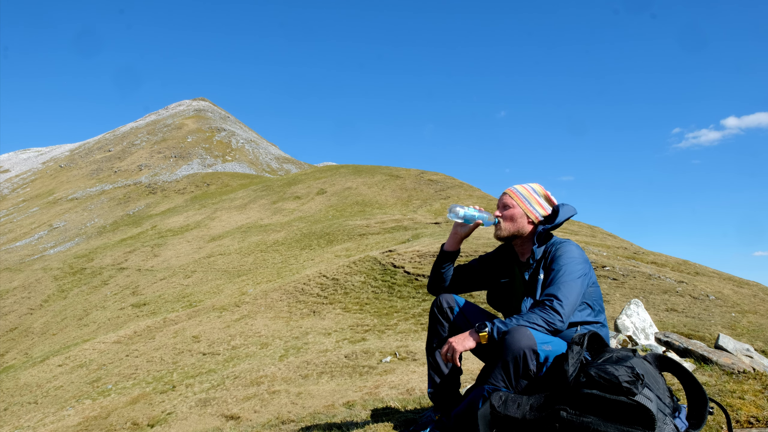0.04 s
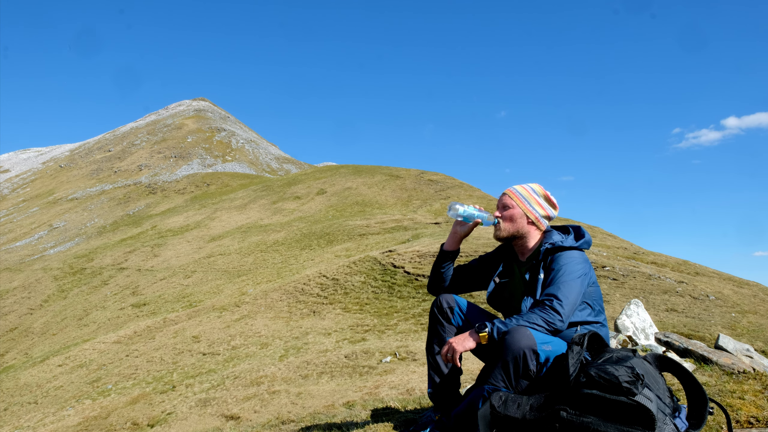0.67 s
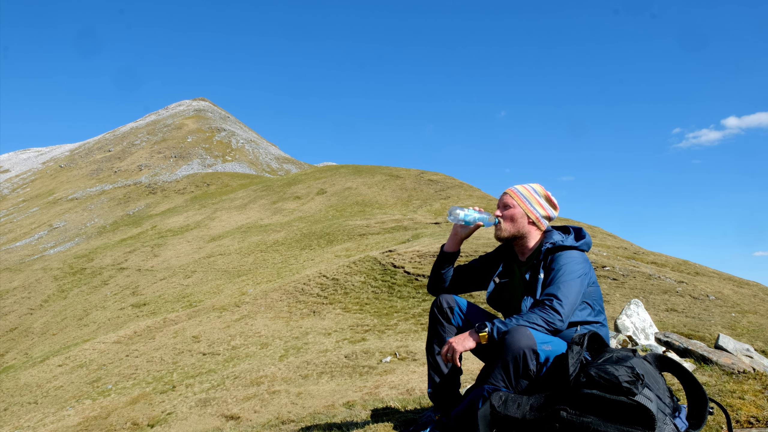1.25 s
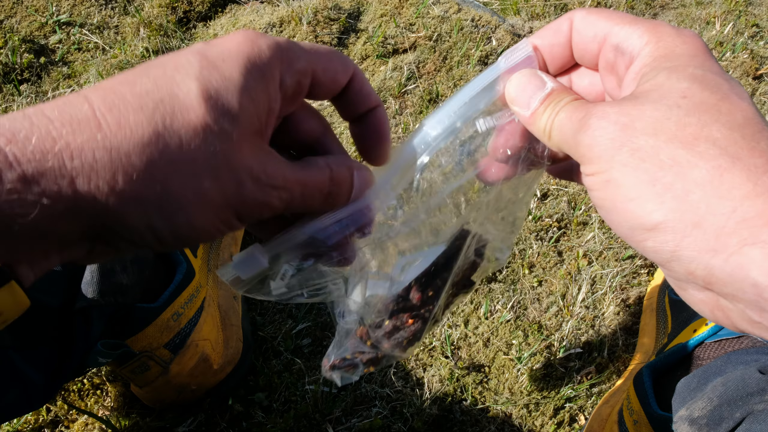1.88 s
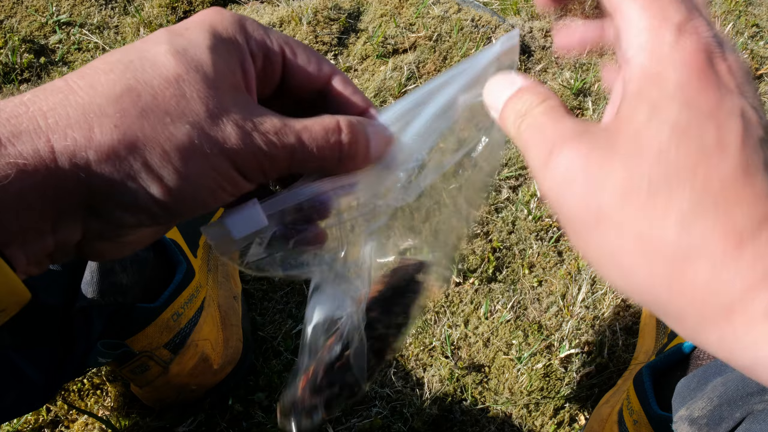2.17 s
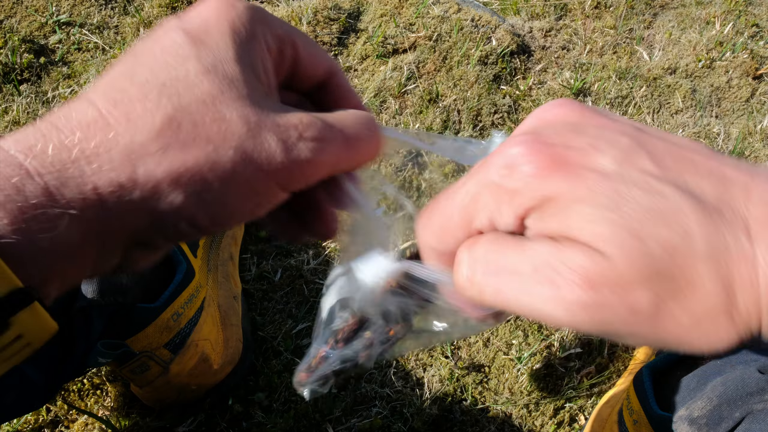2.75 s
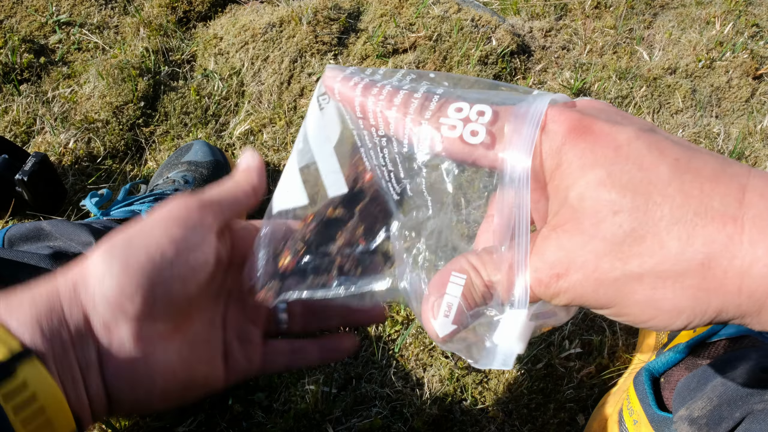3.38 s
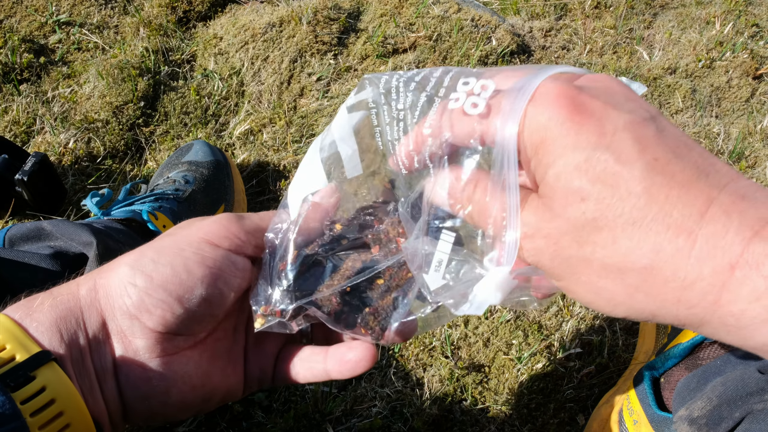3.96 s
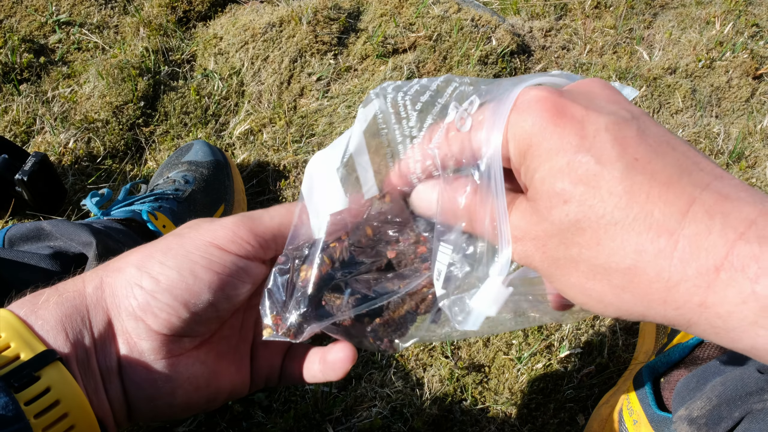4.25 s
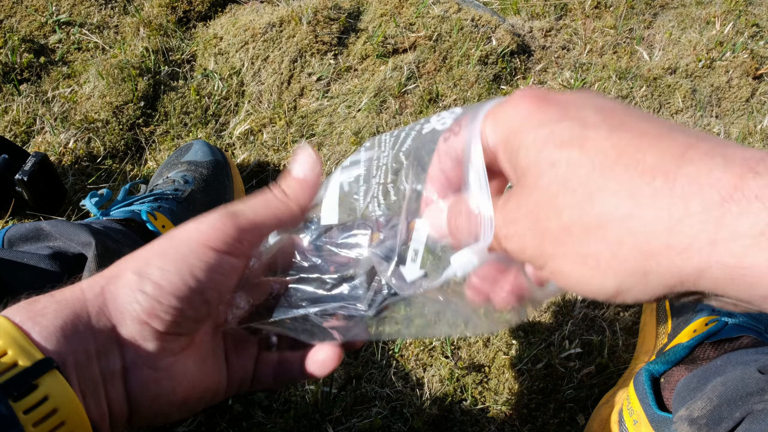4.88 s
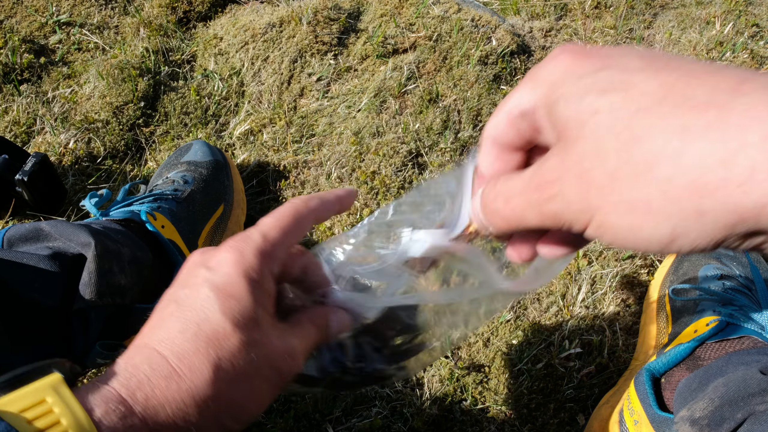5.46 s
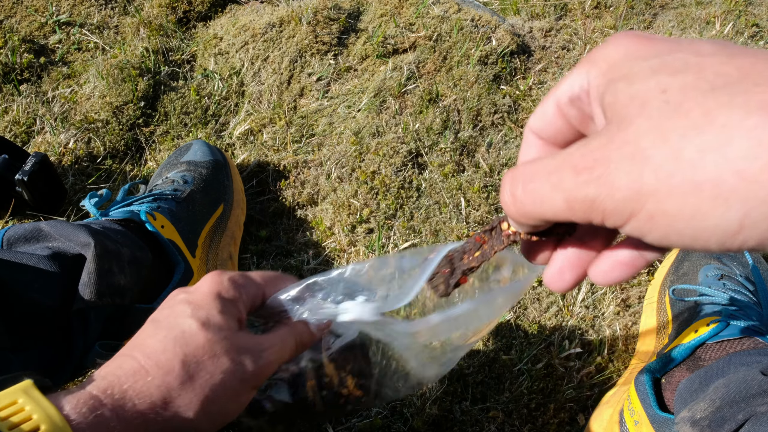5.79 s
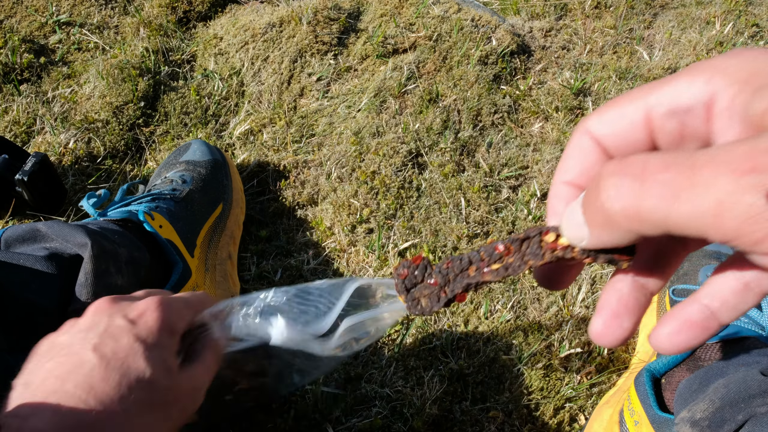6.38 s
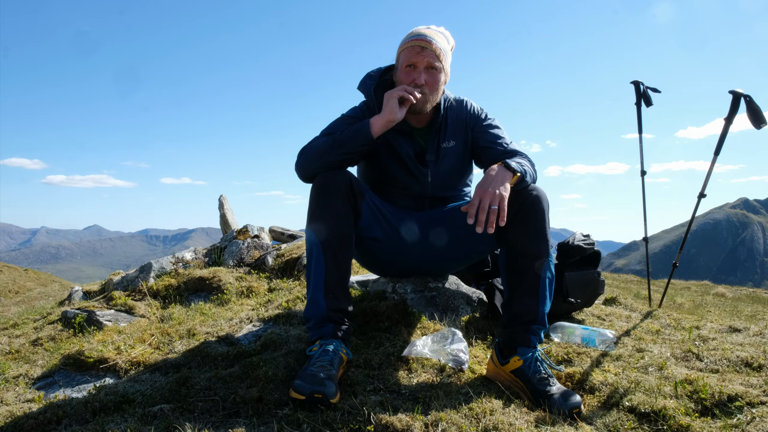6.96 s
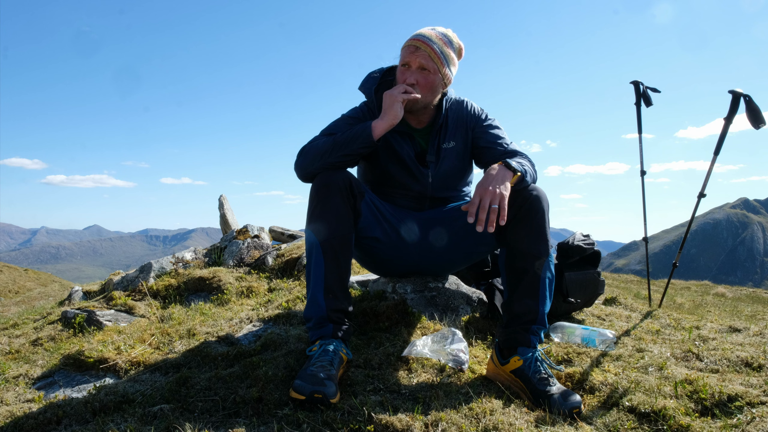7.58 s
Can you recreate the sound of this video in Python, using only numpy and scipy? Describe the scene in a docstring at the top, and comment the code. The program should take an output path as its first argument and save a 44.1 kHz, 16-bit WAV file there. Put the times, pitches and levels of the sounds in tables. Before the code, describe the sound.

Faint gulps from a water bottle, then a thin plastic bag crinkles loudly as hands open it, over light wind.

```python
"""Breezy hillside. A walker gulps water from a bottle (wet clicks, bubbles, squelches) while his
jacket hood slides down, fabric rubbing on fabric. Then, close up, hands open a thin plastic food bag
and slide a snack bar out: large creases buckle and snap over a dense crackle of small ones and the
rub of sliding film. The crinkling stops abruptly, leaving wind on the microphone and a faint rustle."""
import sys
import numpy as np
from scipy import signal
from scipy.fft import rfft, irfft
from scipy.io import wavfile
from scipy.ndimage import uniform_filter1d

SR = 44100
rng = np.random.default_rng(int(sys.argv[2]) if len(sys.argv) > 2 else 0)


def persist_wave(psi):
    """Save psi, clipped to +-1, as 16-bit WAV."""
    counts = np.round(np.clip(psi, -1, 1) * 32767).astype(np.int16)
    wavfile.write(sys.argv[1], SR, np.atleast_2d(counts).T)


N = 336526
TIME_S = np.arange(N) / SR
BAG_START_S, BAG_END_S = 1.578, 6.619
BAG_ACTIVE = (TIME_S > BAG_START_S) & (TIME_S < BAG_END_S)
SNAP_SPAN_S = 0.002  # snap levels are rms over this span

# hillside air (frequency [Hz], relative density [dB])
AIR_SPECTRUM = [(59, -29), (100, 6), (328, 9), (433, -2), (634, -4), (768, -12.5), (970, -23.5),
                (1420, -43), (4570, -34), (14100, -12), (16000, -19)]
# wind and handling at the microphone (frequency [Hz], relative density [dB])
WIND_SPECTRUM = [(12, -42), (25, -14.5), (55, -4), (100, -4), (180, -8), (330, -12.5), (470, -20.5),
                 (1200, -33), (2500, -64)]
# wind envelope (time [s], level [dB])
GUSTS = [(0, -56), (.7, -64), (1.15, -71), (1.55, -68.5), (1.63, -57.5), (1.9, -46.5), (2.4, -55.5),
         (3.1, -51.5), (3.45, -55.5), (4.0, -55), (4.5, -52), (5.85, -59.5), (6.25, -55), (6.5, -53),
         (6.65, -47.5), (7.2, -53), (7.63, -51)]
# single wind buffets (time [s], peak [dB], frequency [Hz])
BUFFETS = [(6.648, -45, 151), (6.815, -39.5, 160), (6.865, -39, 85), (6.909, -40, 119), (6.972, -35, 65),
           (7.059, -35.5, 78), (7.14, -42, 60)]
# jacket fabric (frequency [Hz], relative density [dB])
FABRIC_SPECTRUM = [(300, -4.5), (500, 4.5), (1000, -0.5), (1450, -4), (2200, -4), (3600, -0.5), (5000, -5),
                   (7000, -8.5), (10000, -12), (16000, -28)]
# jacket stirring (time [s], level [dB])
RUSTLE = [(0, -62), (.27, -60.5), (.45, -57), (.7, -65), (1.35, -66.5), (1.7, -59), (6.2, -56.5),
          (6.64, -51), (6.85, -57.5), (7.25, -59), (7.5, -52), (7.63, -54)]
# hood fabric (frequency [Hz], relative density [dB])
HOOD_SPECTRUM = [(530, -40.5), (900, -12), (1710, -3), (2710, -4.5), (3220, -0.5), (3780, -5), (4290, -1),
                 (5990, -1.5), (7360, -9), (14000, -32)]
# hood sliding down (time [s], level [dB])
HOOD_SLIDE = [(.33, -72), (.41, -60), (.44, -46.5), (.49, -51.5), (.52, -57), (.6, -75), (.7, -100)]
# water gulps (time [s], click peak [dB], click pitch [Hz],
# bubble level [dB], bubble pitch [Hz], bubble glide [Hz/s], bubble decay [s])
GULPS = [(0.056, -37, 900, -59, 254, 1500, 0.025), (0.141, -41, 800, -52, 407, 11002, 0.021),
         (0.3147, -40.5, 800, -46, 340, 9000, .015), (0.6434, -29.5, 3560, -44, 300, 1000, 0.0067),
         (0.6514, -33, 2300, -55, 336, 1000, 0.0091), (0.7711, -38, 1490, -76, 340, 998, 0.0063),
         (0.776, -31.5, 3250, -40.5, 298, -1000, 0.0066), (0.918, -30.5, 3160, -44, 310, -1000, 0.0043),
         (1.0463, -28.5, 7200, -50, 320, 2500, 0.015), (1.2056, -37.5, 1090, -47, 253, 7500, 0.025)]
# mouth squelches and a swallow (time [s], level [dB], centre [Hz], width [Hz], length [s])
SQUELCHES = [(.053, -58, 830, 700, 0.041), (.06, -52, 287, 120, 0.02), (.088, -53, 640, 200, 0.014),
             (.098, -56, 2150, 600, 0.0048), (.484, -50.5, 700, 800, 0.0068), (.653, -56, 840, 600, 0.0095),
             (1.333, -55, 185, 70, 0.051), (1.333, -58.5, 643, 200, 0.014)]
# plastic film (frequency [Hz], relative density [dB])
FILM_SPECTRUM = [(150, -17.5), (300, -3.5), (450, -8), (700, -2), (1100, 0.5), (1300, -1.5), (1800, 0),
                 (2450, -4.5), (3100, -5.5), (3600, -3.5), (7000, -4), (9000, -8.5), (12000, -17),
                 (16000, -24)]
# grip between strokes, slack as the fingers rest or the bar comes free (time [s], effort [dB])
GRIP = [(1.58, -47.5), (2.1, -46), (3.02, -44), (3.32, -54.5), (3.73, -55.5), (3.95, -46), (4.33, -46.5),
        (4.38, -64.5), (4.43, -61), (4.48, -44), (5.15, -46.5), (5.68, -43), (5.88, -55), (6.02, -44),
        (6.09, -60), (6.25, -58), (6.45, -46)]
# pinches at the seal, shoves inside the bag (time [s], length [s], effort [dB], sliding share [0-1])
STROKES = [(1.668, .02, -42, 0.01), (1.715, 0.052, -34.5, 0.11), (1.794, .055, -37, 0),
           (1.899, 0.046, -35.5, 0), (2.03, .08, -36.5, 0.07), (2.186, .022, -38, 0),
           (2.309, .06, -36.5, 0.04), (2.381, 0.039, -32.5, 0), (2.509, .02, -40, 0),
           (2.553, 0.054, -38, 0.1), (2.637, .085, -36.5, 0), (2.776, .1, -37, 0.03),
           (2.884, 0.054, -40.5, 0.4), (3.004, .035, -39, 0.56), (3.031, .052, -28.5, 0.15),
           (3.097, 0.089, -34, 0.4), (3.208, .05, -41.5, 0.2), (3.452, 0.089, -42, 0.42),
           (3.516, .1, -35, 0.1), (3.654, .04, -39, 0.12), (3.766, 0.032, -41.5, 0.03),
           (3.994, 0.077, -42.5, 0.07), (4.13, 0.098, -38.5, 0), (4.269, .06, -40.5, 0.07),
           (4.47, 0.058, -37, 0), (4.57, .205, -38, 0.25), (4.834, 0.1, -42, 0.45),
           (4.959, 0.046, -34.5, 0.37), (5.023, 0.07, -41, 0.2), (5.147, 0.052, -40, 0.04),
           (5.252, 0.065, -36.5, 0.17), (5.319, 0.13, -36, 0.23), (5.53, 0.05, -42.5, 0.05),
           (5.636, .02, -44, 0.3), (5.715, .115, -42, 0.2), (5.935, 0.045, -43, 0),
           (6.322, 0.064, -45.5, 0.41), (6.401, 0.034, -38, 0.67), (6.476, 0.12, -39, 0.95)]
# wide panels rumpling, louder with the hand inside (time [s], level relative to effort [dB])
RUMPLE = [(1.6, -3), (2.2, -6), (2.7, -3.5), (3.05, -1.5), (3.35, 4), (3.6, 0.5), (3.85, 1), (4.7, 1.5),
          (5.4, -1.5), (5.9, -1), (6.6, -3.5)]
# air pocket of the open bag (centre [Hz], width [Hz], gain [dB])
POCKET_MODES = [(1694, 30, -9)]
# taut film slipping under the fingers (time [s], level [dB], centre [Hz], width [Hz], length [s])
SLIPS = [(2.194, -30, 2900, 599, 0.0038), (3.052, -34.5, 219.6, 139.7, 0.02),
         (4.524, -25.5, 1689, 600, 0.0058), (4.992, -41.5, 998, 502.4, 0.012),
         (5.541, -32.5, 3525, 800, 0.008), (5.652, -36.5, 1605, 496, 0.013), (5.697, -36, 1020, 220, 0.011)]
# large creases snapping through (time [s], level [dB], pitch [Hz])
SNAPS = [(1.621, -32.5, 8970), (1.6836, -26, 10000), (1.758, -21, 9700), (1.845, -24, 3540),
         (1.8529, -22.5, 7140), (1.9102, -28.5, 1170), (1.9318, -18.5, 5410), (2.0566, -23.5, 6320),
         (2.085, -21.5, 8640), (2.155, -26.5, 5920), (2.1886, -22.5, 9800), (2.1952, -26.5, 4930),
         (2.287, -25.5, 3140), (2.412, -30, 6700), (2.4593, -26.5, 1910), (2.528, -26, 6730),
         (2.5761, -22.5, 7850), (2.6932, -22.5, 7340), (2.7853, -24.5, 9410), (2.8082, -24.5, 10030),
         (2.8564, -27.5, 7440), (2.9383, -25, 6370), (3.0602, -20, 5220), (3.1771, -24, 8900),
         (3.211, -21, 4180), (3.2703, -25.5, 5750), (3.294, -34.5, 1270), (3.477, -29.5, 9000),
         (3.6621, -24.5, 6300), (3.7048, -26.5, 2172), (3.7527, -32.5, 4390), (3.8026, -32, 1803),
         (3.888, -29, 3650), (3.9294, -34, 10060), (3.96, -31.5, 4110), (4.0376, -26, 5640),
         (4.1641, -24, 4900), (4.203, -27, 5230), (4.2806, -28.5, 1578), (4.3605, -32, 3214),
         (4.421, -35, 3650), (4.462, -29, 1000), (4.5254, -21.5, 1653), (4.606, -30, 2210),
         (4.708, -27.5, 5890), (4.815, -28, 4440), (5.0004, -28.5, 1020), (5.1641, -25.5, 6210),
         (5.1992, -23, 8210), (5.5442, -29.5, 2810), (5.5844, -17.5, 7300), (5.5894, -25.5, 2720),
         (5.7328, -24, 9150), (5.76, -28, 1810), (5.9062, -29, 10400), (5.9111, -24, 3057),
         (6.011, -38.5, 7440), (6.0572, -41, 1506), (6.107, -43.5, 5880), (6.1625, -46, 4900),
         (6.3177, -37.5, 5225), (6.356, -34, 5260), (6.3616, -32.5, 2690), (6.4236, -30, 1593)]


def amp(db):
    return 10 ** (np.asarray(db) / 20)


def unit_rms(x):
    return x / np.sqrt(np.mean(x ** 2) + 1e-20)


def curve(rows):
    return np.interp(TIME_S, *np.transpose(rows))


def spectrum_db(spectrum, hz):
    knots_hz, db = np.transpose(spectrum)
    return np.interp(np.log(hz + 1), np.log(knots_hz + 1), db)


def add(mix, at_s, sound):
    part = mix[max(round(at_s * SR), 0):][:len(sound)]
    part += sound[:len(part)]


def noise(spectrum):
    """Steady coloured noise, rms 1."""
    gain = amp(spectrum_db(spectrum, np.fft.rfftfreq(N, 1 / SR)))
    return unit_rms(irfft(rfft(rng.standard_normal(N)) * gain, N))


def wander(top_hz):
    """Slow random drift, rms 1."""
    rolloff = 1 + (np.fft.rfftfreq(N, 1 / SR) / top_hz) ** 4
    return unit_rms(irfft(rfft(rng.standard_normal(N)) / rolloff, N))


def band(x, lo_hz, hi_hz, order=2):
    sos = signal.butter(order, [lo_hz, min(hi_hz, 0.49 * SR)], "bandpass", fs=SR, output="sos")
    return signal.sosfilt(sos, x)


def steadied(x, span_s):
    """Running power levelled to 1."""
    size = max(int(span_s * SR), 2)
    power = uniform_filter1d(uniform_filter1d(x ** 2, size), size)
    return x / np.sqrt(abs(power) + 1e-12)


def min_phase(x, gain_db):
    """Minimum-phase colouring: keeps a click compact."""
    log_gain = np.log(amp(np.r_[gain_db, gain_db[-2:0:-1]]))
    response = np.exp(np.conj(signal.hilbert(log_gain)))[:len(gain_db)]
    return irfft(rfft(x) * response)


def wind(lump_db=1.0, air_db=-67.5):
    """Lumpy rumble and single pressure swings over the hush of the hillside."""
    out = unit_rms(noise(WIND_SPECTRUM) * amp(lump_db * wander(16))) * amp(curve(GUSTS))
    for at_s, db, hz in BUFFETS:
        phase = 2 * np.pi * hz * (TIME_S - at_s)
        out += amp(db) * phase * np.exp((1 - phase ** 2) / 2)
    return out + amp(air_db) * noise(AIR_SPECTRUM)


def jacket(grain_db=2.5, sway_db=1.94):
    """Fabric rubs on fabric: grainy hiss from body and hood."""
    grain = amp(grain_db * wander(260) + sway_db * wander(17))
    body = unit_rms(noise(FABRIC_SPECTRUM) * grain) * amp(curve(RUSTLE))
    hood = unit_rms(noise(HOOD_SPECTRUM) * grain) * amp(curve(HOOD_SLIDE))
    return body + hood


def crease(hz, ring_s=0.00087, flutter_db=-8, flutter_s=0.0052, skirt_db_per_oct=5, overtone_db=5):
    """A plastic crease buckles and rings near its pitch; flutter spreads through the sheet. Energy 1."""
    size = 1024
    t, bins_hz = np.arange(size) / SR, np.fft.rfftfreq(size, 1 / SR)
    buckle = rng.standard_normal(size) * np.exp(-t / ring_s)
    buckle[0] += 1.27 * np.sign(buckle[0])  # initial kick
    octaves = np.log2((bins_hz + 1) / hz)
    peak_db = overtone_db * np.exp(-((octaves - rng.normal(0, 0.21)) / 0.16) ** 2)
    skirt_db = skirt_db_per_oct * np.minimum(abs(octaves), 2.5)
    film_db = spectrum_db(FILM_SPECTRUM, bins_hz)
    click = min_phase(buckle, film_db + peak_db - skirt_db)
    flutter = min_phase(rng.standard_normal(size) * np.exp(-t / flutter_s), film_db)
    return unit_rms(unit_rms(click) + amp(flutter_db) * unit_rms(flutter)) / np.sqrt(size)


def bottle(count=32):
    """The thin bottle ticks faintly in the hand until the bag starts."""
    out = np.zeros(N)
    for when, size, pitch in rng.random((count, 3)):
        tick = amp(-47 + 9 * size ** 2) * crease(3000 + 4000 * pitch, flutter_db=-16)
        add(out, when * BAG_START_S, tick)
    return out


def friction_bursts(rows):
    """Irregular friction inside one resonance: short rough tones."""
    out = np.zeros(N)
    for at_s, db, hz, width_hz, length_s in rows:
        friction = band(rng.standard_normal(SR // 4), max(hz - width_hz / 2, 40), hz + width_hz / 2)
        tone = steadied(friction, span_s=0.008)[SR // 8:][:int(length_s * SR)]
        add(out, at_s, amp(db) * unit_rms(tone * signal.windows.tukey(len(tone), 0.5)))
    return out


def wet_click(hz, push_s=0.00086, ring_s=0.00081):
    """A water film breaks: pressure push, fine spray, ring of the cavity behind it. Peak 1."""
    t = np.arange(512) / SR
    cavity = 0.57 * np.sin(2 * np.pi * hz * t)
    spray = 0.41 * rng.standard_normal(len(t))
    click = band(np.exp(-t / push_s) + np.exp(-t / ring_s) * (cavity + spray), 237, 9300, order=4)
    return click / abs(click).max()


def gulps(sag_hz=170, sag_s=0.0041):
    """A wet click and a bubble each; pitch sags as the bubble forms, then mostly rises as it shrinks."""
    out, t = np.zeros(N), np.arange(SR // 8) / SR
    for at_s, click_db, click_hz, bubble_db, bubble_hz, glide_hz_per_s, decay_s in GULPS:
        pitch_hz = bubble_hz + glide_hz_per_s * t + sag_hz * np.exp(-t / sag_s)
        bubble = np.exp(-t / decay_s) * np.sin(2 * np.pi * np.cumsum(pitch_hz) / SR)
        add(out, at_s, -amp(bubble_db) * bubble)
        add(out, at_s, -amp(click_db) * wet_click(click_hz))
    return out


def handling(attack_s=0.02, release_s=0.031, grip_slide=0.2):
    """Finger strokes swell, hold and let go over the grip. Returns (effort [dB], sliding share [0-1])."""
    power = amp(curve(GRIP)) ** 2
    sliding = grip_slide * power
    t = np.arange(SR // 2) / SR
    for at_s, length_s, db, slide in STROKES:
        envelope = np.minimum(t / attack_s, 1) * np.exp(-np.maximum(t - length_s, 0) / release_s)
        stroke_power = (amp(db) * envelope) ** 2
        add(power, at_s, stroke_power)
        add(sliding, at_s, slide * stroke_power)
    return 10 * np.log10(power), np.clip(sliding / power, 0.01, 1)


def bag_flaps(rumple_db, gain_db=-12, flicker_db=5):
    """The whole bag flaps softly as its panels move."""
    flaps = band(rng.standard_normal(N) * amp(flicker_db * wander(57)), 125, 370, order=4)
    return steadied(flaps, span_s=0.063) * amp(rumple_db + gain_db) * BAG_ACTIVE


def air_pocket(film):
    """The film's sound plus the faint ring of the air in the bag."""
    return film + sum(amp(db) * signal.lfilter(*signal.iirpeak(hz, hz / width_hz, fs=SR), film)
                      for hz, width_hz, db in POCKET_MODES)


def small_creases(effort_db, median_per_s=440, spread_db=5.5, clump_db=3.5, pitches=40):
    """Random ticks of many pitches, clumped in level, denser with effort."""
    rate_per_s = median_per_s * amp(0.78 * (effort_db - np.median(effort_db)))
    sizes = amp(spread_db * np.minimum(rng.exponential(1, N), 2.1) + clump_db * wander(60))
    impulses = sizes * rng.choice([-1, 1], N) * (rng.random(N) < rate_per_s / SR)
    pitch_index = rng.integers(0, pitches, N)
    out = np.zeros(N)
    for k, hz in enumerate(np.geomspace(1200, 13000, pitches)):
        tick = crease(hz, ring_s=0.0006, flutter_db=-12, flutter_s=0.003)
        out += signal.oaconvolve(impulses * (pitch_index == k), tick)[:N]
    return out


def crackle(effort_db, rumple_db, slide, split_hz=2500, rough_db=2.64):
    """Small creases tick and sliding film rubs, in a crisp and a dull band."""
    creases = small_creases(effort_db)
    friction = band(noise(FILM_SPECTRUM), 124, 9500) * amp(rough_db * wander(123))
    dull_slide = np.clip(slide + 0.38, 0, 1)  # wide panels rub more than small creases
    crisp = (split_hz, 20000, slide, effort_db)
    dull = (150, split_hz, dull_slide, rumple_db - 0.9)
    out = np.zeros(N)
    for lo_hz, hi_hz, rub_share, db in (crisp, dull):
        ticks = steadied(band(creases, lo_hz, hi_hz, order=3), span_s=0.028)
        rub = unit_rms(band(friction, lo_hz, hi_hz, order=3))
        out += amp(db) * (np.sqrt(1 - rub_share) * ticks + np.sqrt(rub_share) * rub)
    return out * BAG_ACTIVE


def stray_snaps(effort_db, typical_db=-32.5, spread_db=2, centre_hz=4800, count=120):
    """Middling creases give way at random, more often and louder with effort."""
    extra_db = effort_db - np.median(effort_db[BAG_ACTIVE])
    strain = np.cumsum(amp(0.35 * extra_db) * BAG_ACTIVE)
    out = np.zeros(N)
    for k, (jitter, size, pitch) in enumerate(rng.uniform(-1, 1, (count, 3))):
        onset = np.searchsorted(strain, strain[-1] * (k + 1 + jitter) / (count + 1))
        db = typical_db + 0.61 * extra_db[onset] + spread_db * size
        hz = centre_hz * 2 ** (0.91 * np.arcsin(pitch))
        add(out, TIME_S[onset], amp(db) * np.sqrt(SR * SNAP_SPAN_S) * crease(hz))
    return out


def large_snaps(give_db=-11, max_lead_s=0.0018, repeat_db=-12, max_lag_s=0.006):
    """Each large crease gives a little, snaps through, and a faint repeat follows a few milliseconds later."""
    out = np.zeros(N)
    for (at_s, db, hz), (lead, lag) in zip(SNAPS, rng.uniform(0.2, 1, (len(SNAPS), 2))):
        gain = amp(db) * np.sqrt(SR * SNAP_SPAN_S)
        add(out, at_s - max_lead_s * lead, gain * amp(give_db) * crease(hz))
        add(out, at_s, gain * crease(hz))
        add(out, at_s + max_lag_s * lag, gain * amp(repeat_db) * crease(hz))
    return out


def scene():
    """Bag, drinking, jacket and wind, mono."""
    effort_db, slide = handling()
    rumple_db = effort_db + curve(RUMPLE)
    film = large_snaps() + stray_snaps(effort_db) + crackle(effort_db, rumple_db, slide)
    bag = air_pocket(film) + bag_flaps(rumple_db) + friction_bursts(SLIPS)
    drinking = gulps() + friction_bursts(SQUELCHES) + bottle()
    return (bag + drinking + jacket() + wind())[None]


def record(dry):
    """Band limit: steep low-pass."""
    edge_hz = 16100
    lowpass = signal.firwin(401, edge_hz, window=("kaiser", 9), fs=SR)
    return signal.oaconvolve(dry, lowpass[None], "same")


dry = scene()
out = record(dry)
persist_wave(out)
```